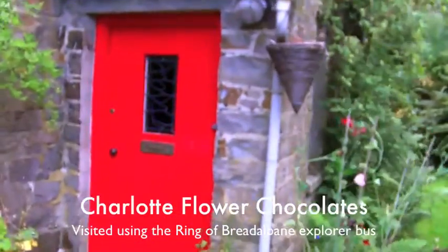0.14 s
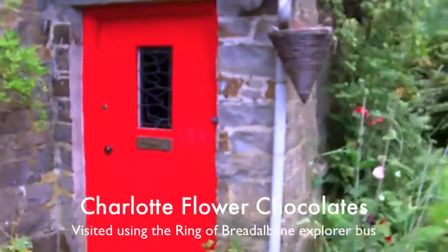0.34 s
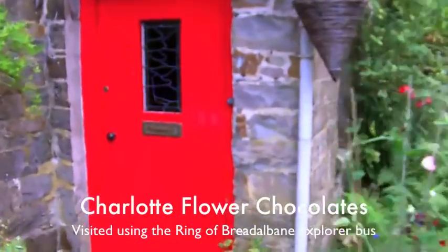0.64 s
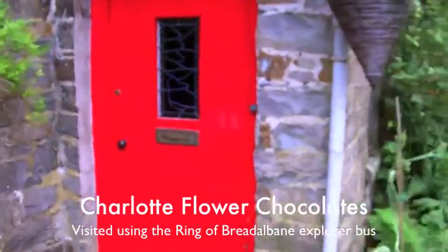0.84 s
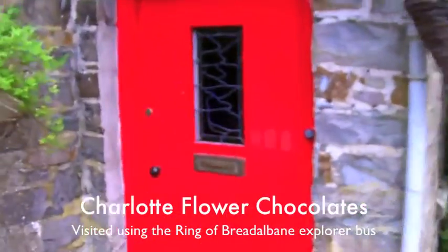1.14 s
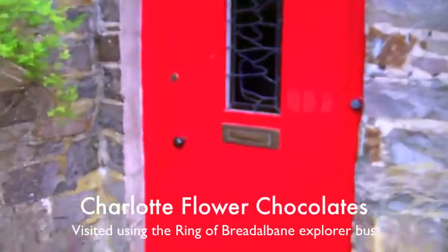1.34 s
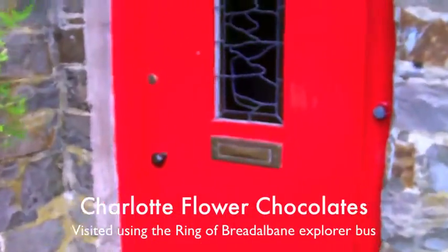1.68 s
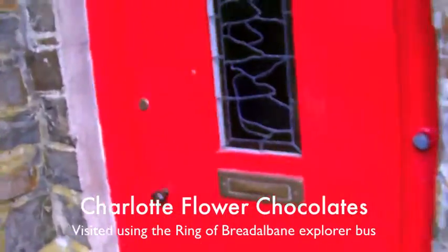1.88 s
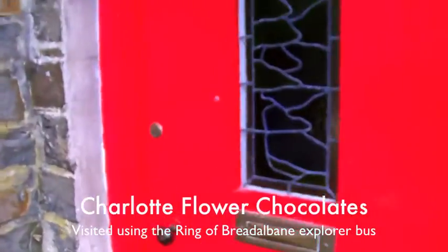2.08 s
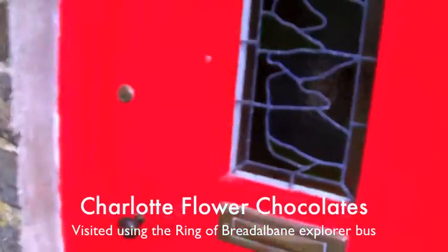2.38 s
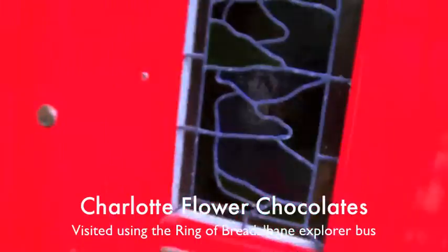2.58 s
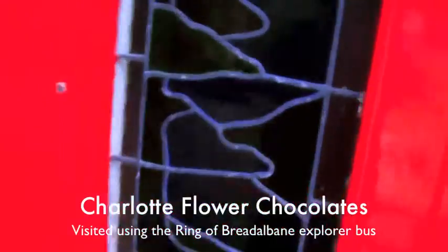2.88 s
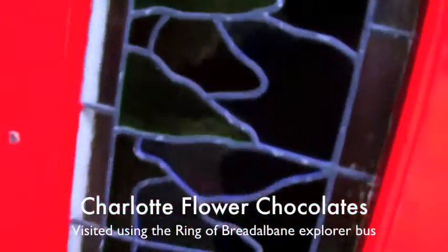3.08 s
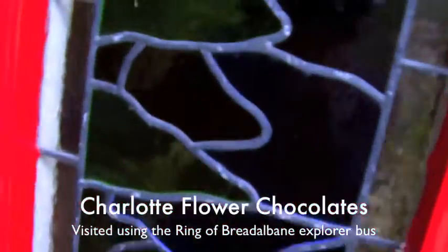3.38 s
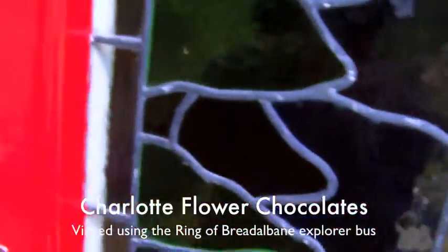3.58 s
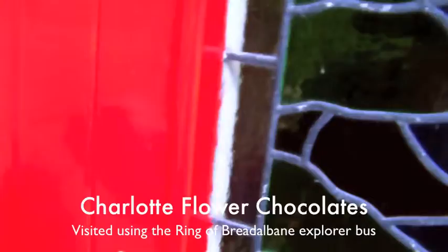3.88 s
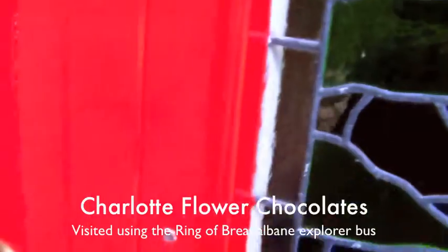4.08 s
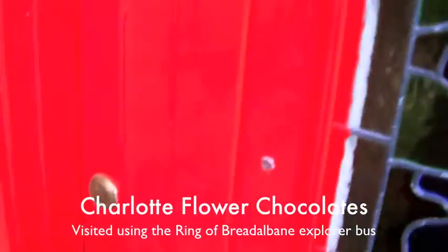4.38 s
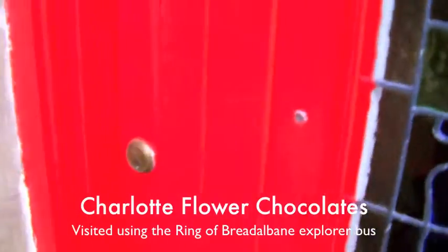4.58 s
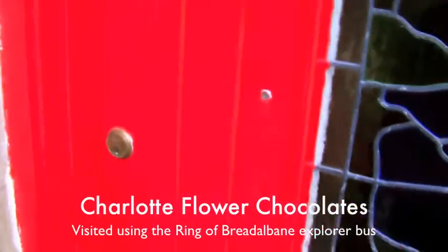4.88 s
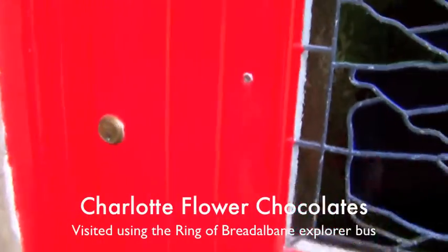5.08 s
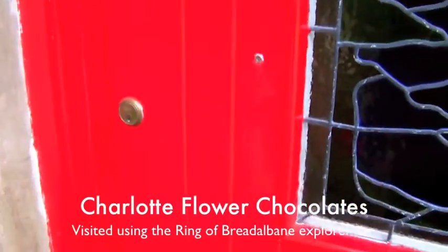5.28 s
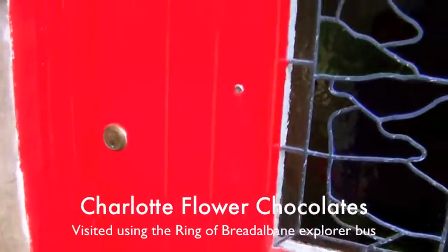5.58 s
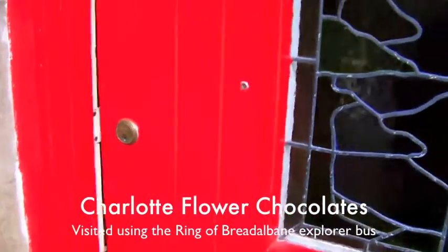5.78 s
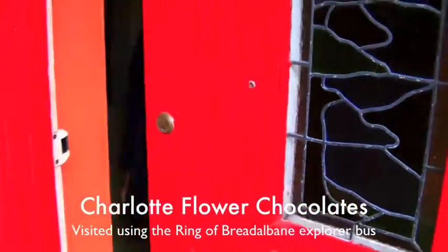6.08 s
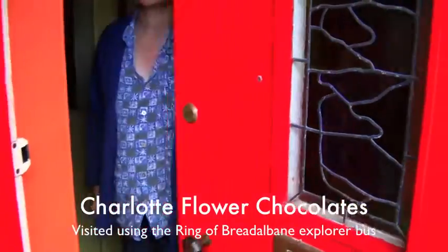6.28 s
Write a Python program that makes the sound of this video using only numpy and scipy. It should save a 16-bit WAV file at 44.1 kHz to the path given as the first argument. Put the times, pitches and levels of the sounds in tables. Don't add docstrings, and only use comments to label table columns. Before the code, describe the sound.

Gritty footsteps approach, three sharp raps rattle a wooden door, and following a quiet wait it unlatches, jerks free and clinks metallically.

```python
import sys
import numpy as np
from scipy import signal
from scipy.fft import rfft, irfft, next_fast_len
from scipy.io import wavfile
from scipy.ndimage import uniform_filter1d

SR = 44100
rng = np.random.default_rng(int(sys.argv[2]) if len(sys.argv) > 2 else 0)


def generate_wav(signal):
    frames = np.transpose(np.atleast_2d(signal))
    scaled = np.clip(frames, -1, 1) * 32767
    pcm = np.round(scaled).astype(np.int16)
    wavfile.write(sys.argv[1], SR, pcm)


def volts_from_db(level):
    exponent = np.asarray(level, float) / 20
    return 10 ** exponent


N = 284180
FFT = next_fast_len(N, real=True)


def evened(x):
    return x / np.sqrt(np.mean(x ** 2) + 1e-20)


def read(points, hz):
    f, value = np.transpose(points)
    return np.interp(np.log(hz + 1), np.log(f + 1), value)


def add(mix, s, sound):
    part = mix[round(s * SR):][:len(sound)]
    part += sound[:len(part)]


def smooth_noise(count, size):
    return uniform_filter1d(rng.standard_normal(count), size=size)


def coloured(points):
    gain = volts_from_db(read(points, np.fft.rfftfreq(FFT, 1 / SR)))
    return evened(irfft(rfft(rng.standard_normal(N), FFT) * gain, FFT)[:N])


def ring(modes, seconds):
    t = np.arange(round(seconds * SR)) / SR
    return sum(volts_from_db(db - 60 * t / t60) * np.sin(2 * np.pi * hz * t) for hz, db, t60 in modes)


def as_heard(x):
    size = next_fast_len(len(x), real=True)
    heard = rfft(x, size) * volts_from_db(read(PORT, np.fft.rfftfreq(size, 1 / SR)))
    return x * np.sqrt(size * len(x) / (2 * np.sum(abs(heard) ** 2)))


# start in seconds, level in dB, first click in dB, rattle in dB,
# delay of the rebound in seconds.
KNOCKS = [
    (3.3075, -19.5, -36, -34, .016),
    (3.5165, -20.5, -31, -31.5, .023),
    (3.6992, -22, -54.5, -30, .0058),
]
# contact in ms, rattle in dB, rattle t60 in seconds,
# rattle tilt in dB per octave.
TOUCH = (0.65, 0, 0.0237, 10)
STRIKE = (0.54, 0, .055, 0.87)
REBOUND = (.55, -29.5, 0.0168, 5)
# start in seconds, blow in dB,
# rattle in dB, rattle t60 in seconds, rattle tilt in dB per octave.
BOLT = [
    (5.6279, -41.5, -39.5, 0.14, -8),
    (5.640, -36.5, -37.5, .083, 1),
    (5.6489, -38, -23, 0.044, 3.5),
    (5.651, -58, -35, 0.17, -6),
    (5.6738, -36.5, -33, 0.054, -4.5),
    (5.690, -41, -51, .044, 7),
    (5.70, -43.5, -56, .17, -14.5),
    (5.715, -44, -43, 0.15, -12.5),
]
JERK = [
    (5.7291, -29, -22, 0.023, -5.5),
    (5.732, -33, -28.5, 0.052, -7),
    (5.737, -27, -35, 0.081, -7),
]
HINGE = [
    (6.2135, -67, -47, 0.12, 0.5),
    (6.228, -49, -50, 0.22, 4),
    (6.241, -44.5, -35, 0.25, 1),
    (6.258, -41.5, -42.5, 0.18, -10.5),
    (6.272, -37.5, -44, 0.24, -8.5),
    (6.30, -61, -60, .3, 7),
]


def blows():
    rows = []
    for spot, (s, db, click_db, rattle_db, after) in enumerate(KNOCKS):
        fall_db = -1050 * after
        contacts = [(-.0032, -11, click_db, TOUCH),
                    (0, 0, rattle_db, STRIKE),
                    (after, fall_db, fall_db, REBOUND)]
        for late, blow_db, loose_db, (contact_ms, own_db, t60, tilt) in contacts:
            rows.append((spot, s + late, db + blow_db, contact_ms, loose_db + own_db, t60, tilt))
    latch, hinge = -2, -1
    for spot, contact_ms, table in [(latch, 0.58, BOLT), (latch, 0.15, JERK), (hinge, 0.46, HINGE)]:
        rows += [(spot, s, db, contact_ms, *loose) for s, db, *loose in table]
    return rows


# frequency in Hz, level in dB.
RATTLE_TOP = [(7000, 2), (11000, -6.5), (16000, -6.5)]


def rattle(db, t60, tilt):
    t = np.arange(SR // 5) / SR
    hz = np.fft.rfftfreq(len(t), 1 / SR)
    bass_cut = hz ** 2 / (hz ** 2 + 300 ** 2)
    colour = volts_from_db(tilt * np.log2(np.maximum(hz, 280) / 3000) + read(RATTLE_TOP, hz)) * bass_cut
    uneven = volts_from_db(3.4 * evened(smooth_noise(len(t), 50)))
    envelope = volts_from_db(db - 60 * t / t60) * np.minimum(t / 0.0012, 1)
    noise = rng.standard_normal(len(t))
    return envelope * uneven * as_heard(irfft(rfft(noise) * colour, len(t)))


# frequency in Hz, t60 in seconds, level in dB when struck high, middle, low, at
DOOR_MODES = [(220.5, 0.054, -9, -9, -36, -15, -14), (357, .06, -9.5, -1.5, -20, -18, -14),
              (372, .3, -20.5, -25, -31, -30, -30), (385, 0.28, -23, -23, -28, -28, -28),
              (397.7, 0.081, -14.5, -3.5, -2.5, -7, -23), (426.5, 0.057, 0, -4.5, 4, -9.5, -29),
              (511, 0.019, 3, 3, -14, -29, -9), (579, 0.093, -13, -11.5, -8.5, -7, -5.5),
              (721, 0.043, -10, -12.5, -23, 3.5, -2), (810, 0.051, -5, -10, -13, -2, -2),
              (1079, 0.025, -5, -12, -14, 6, 3),
              (1245, 0.013, -3.5, -0.5, -21, 0.5, 7.5), (1492, 0.03, -12, -6, -34, 1, -20),
              (1643, 0.015, -11, -19, -30, 2.5, -8), (1848, 0.015, 0, -6, -31, -9, 3),
              (2070, 0.013, 4.5, 0.5, -29, -1, -16), (2290, 0.028, -7.5, -7, -23, -6.5, -18),
              (2640, .025, -16.5, -10.5, -29, -17, -10), (3300, 0.022, -4, -13.5, -23, -22, -10),
              (3870, 0.018, -4.5, -9.5, -13.5, -21, -10)]


def door():
    out = np.zeros(N)
    modes = DOOR_MODES
    panels = [ring([(hz, db[spot], t60) for hz, t60, *db in modes], .2) for spot in range(5)]
    for spot, s, blow_db, contact_ms, *loose in blows():
        push = np.sin(np.pi * np.arange(0, 1, 1000 / (SR * contact_ms)))
        add(out, s, volts_from_db(blow_db) * signal.fftconvolve(panels[spot], push / push.sum()))
        add(out, s, rattle(*loose))
    return out


# start in seconds, level in dB, free ringing in seconds before it touches again.
CLINKS = [
    (6.214, -59, 0.008),
    (6.237, -41, 0.0048),
    (6.2395, -28, 0.014),
    (6.262, -66, .01),
]
# frequency in Hz, level in dB, t60 in seconds.
METAL_MODES = [(2732, -2, 0.33), (4760, -12, 0.055), (5400, -14, 0.26), (5820, -24, .12),
               (7100, -12, 0.066), (8580, -3.5, .16)]


def fittings():
    out = np.zeros(N)
    t = np.arange(round(.3 * SR)) / SR
    for s, db, free in CLINKS:
        tip_db = 1.1 * rng.standard_normal(len(METAL_MODES))
        modes = [(hz, level + tip, t60) for (hz, level, t60), tip in zip(METAL_MODES, tip_db)]
        touch_db = -13 * np.clip((t - free) / 0.0023, 0, 1)
        add(out, s, volts_from_db(db + touch_db) * ring(modes, .3))
    return out


def doorway(x):
    t = np.arange(SR // 2) / SR
    taps = rng.choice([-1., 1.], len(t)) * (rng.random(len(t)) < .05) * (t > .004)
    low = signal.lfilter(*signal.butter(1, 900, fs=SR), taps)
    tail = volts_from_db(-60 * t / 0.22) * low + volts_from_db(-2 - 60 * t / 0.13) * (taps - low)
    return signal.oaconvolve(x, tail / np.linalg.norm(tail))[:N]


# start in seconds, level in dB, rise in ms, frequency in Hz, overtone in dB.
TICKS = [
    (2.3675, -42, 0.92, 2800, 0),
    (2.4374, -35.5, 0.79, 2840, 4),
    (3.3825, -30, 1.5, 3250, 5),
    (3.6642, -35.5, 2.96, 3300, 6),
    (3.682, -62.5, 1.1, 2900, -18),
    (5.648, -25.5, 1.5, 6000, 0),
    (5.7285, -30, .5, 5800, 0),
]


def ticks():
    out = np.zeros(N)
    for s, db, rise_ms, low_hz, high_db in TICKS:
        scrape = np.hanning(round(2 * rise_ms * SR / 1000))
        scrape = scrape * smooth_noise(400, 3)[:len(scrape)]
        scrape = np.diff(scrape, 2)
        modes = [(low_hz, 0, .008), (1.2 * low_hz, high_db - 26, .003)]
        sound = np.convolve(ring(modes, .04), scrape)
        add(out, s, volts_from_db(db) * sound / abs(sound).max())
    return out


# centre in seconds, length in seconds, level in dB,
# brightness in dB per octave.
STEPS = [(.696, 0.066, -55, -4), (.891, 0.024, -50.5, -1.5), (.983, 0.051, -48, -2),
         (1.19, 0.031, -49, -2.5), (1.497, 0.043, -52, -1.5), (1.683, .056, -44, -4), (1.791, .006, -49, 1),
         (1.988, 0.03, -45.5, -1), (2.193, 0.03, -46, -4), (2.237, 0.036, -45.5, 7.5),
         (2.303, 0.079, -49, 5), (2.366, .037, -41, 1.5), (2.391, 0.023, -37, 5), (2.407, 0.0099, -51, 6),
         (2.426, .03, -36, 4), (2.506, 0.017, -53, 5), (2.573, 0.05, -47, 3.5), (2.678, 0.043, -50, -1.5),
         (2.71, 0.027, -41.5, -1.5), (2.741, 0.021, -49, -4), (2.864, 0.041, -34, 2.5),
         (2.94, 0.05, -54, 0)]
SHUFFLES = [(3.618, .008, -56, 4), (4.787, .023, -50.5, -1.5), (4.812, 0.039, -46, 2),
            (4.865, 0.018, -52.5, -4), (5.043, .029, -51.5, 2), (5.079, 0.044, -49, -1),
            (5.123, 0.035, -45, -0.5), (5.615, .028, -51.5, 1), (5.892, .004, -57, -6),
            (6.411, 0.045, -60, 6)]
RUSTLES = [(.319, .004, -52, -5), (1.338, .0052, -52, 1), (1.43, 0.045, -54.5, 4.5),
           (1.601, .007, -53.5, 1), (2.17, 0.0041, -56, 0), (3.051, 0.029, -52.5, 0),
           (3.096, .049, -49.5, 3.5), (4.039, 0.0041, -51.5, 5), (4.239, .0033, -48.5, 5),
           (4.273, .0036, -54.5, 0), (4.376, 0.032, -56, -1), (4.542, 0.037, -57.5, 1),
           (5.524, .0049, -53, 0.5), (6.159, 0.0067, -56, -1)]
PATS = [(.214, 0.0039, -50.5, 0.5), (1.713, .0022, -39.5, 0), (3.215, 0.021, -62, 0),
        (4.423, 0.05, -65, 4.5), (5.431, .012, -56, 0), (5.488, 0.029, -56.5, -7), (5.56, .036, -55.5, -7)]
SCUFF_HZ = [800, 2500, 5700, 11000]
# pivot of its brightness in Hz, levels of the four bands in dB.
GRIT = (5100, [-15, -9.5, 0, -19.5])
CLOTH = (2400, [-19, 0, -5, -30])
PAT = (830, [-0.5, -1, -11, -30])


def scuffs():
    grit = rng.standard_normal(N) * volts_from_db(2.0 * evened(smooth_noise(N, 70)))
    power = np.zeros((len(SCUFF_HZ), N))
    for rows, (turn_hz, colour) in [(STEPS, GRIT), (SHUFFLES, GRIT), (RUSTLES, CLOTH), (PATS, PAT)]:
        octaves = np.log2(np.array(SCUFF_HZ) / turn_hz)
        for centre, length, level_db, bright in rows:
            levels = level_db + np.array(colour) + bright * octaves
            u = np.arange(-1, 2.5, 1 / (SR * length))
            stroke = np.where(u < 0, np.exp(-(u / .5) ** 2), 1 / (1 + (u / .5) ** 3))
            for band, db in zip(power, levels):
                add(band, centre - length, (volts_from_db(db - 6.5) * stroke) ** 2)
    hz = np.fft.rfftfreq(FFT, 1 / SR)
    bass_cut = hz ** 2 / (hz ** 2 + 450 ** 2)
    spectrum = rfft(grit, FFT)
    out = np.zeros(N)
    for row, band in zip(np.eye(len(SCUFF_HZ)), power):
        share = read(list(zip(SCUFF_HZ, row)), hz) * bass_cut
        out += as_heard(irfft(spectrum * share, FFT)[:N]) * np.sqrt(band)
    return out


# start in seconds, level in dB, t60 in seconds,
# tilt in dB per octave.
SNAPS = [(1.1764, -49, 0.086, 4.5), (1.6562, -42, 0.1, 0), (1.7089, -48, 0.085, -4), (2.357, -44, 0.1, 5),
         (2.366, -47, 0.026, -1), (2.4205, -56.5, 0.057, -4), (2.437, -53, 0.027, 4),
         (2.5021, -53, .04, 4.5), (2.7081, -45, 0.033, 2.5), (3.2047, -52, 0.13, -4),
         (4.0375, -58, 0.027, 0), (4.2375, -59, 0.028, 3), (4.8227, -48, 0.053, 2), (5.1195, -56, 0.069, 2)]
THUDS = [
    (4.771, -65.5, 0.32, -15),
    (5.4215, -60, 0.24, -11),
    (5.481, -62.5, 0.29, -8.5),
    (5.546, -62, 0.72, -14.5),
]
# start in seconds, length in seconds, level in dB, first and last frequency in Hz.
SQUEAKS = [
    (1.461, 0.03, -62.5, 1870, 1900),
    (1.499, 0.019, -58, 600, 596),
    (2.918, 0.031, -55.5, 1413, 1490),
    (2.939, 0.015, -55, 1570, 2620),
    (3.038, 0.03, -58, 2800, 2500),
    (3.06, .045, -59, 1600, 2300),
    (3.1, .022, -57, 3500, 3300),
    (2.695, .03, -58, 1800, 1750),
    (2.84, .03, -57, 1300, 1400),
    (4.524, 0.034, -65, 1520, 1510),
]


def soles():
    out = np.zeros(N)
    for s, *snap in [*SNAPS, *THUDS]:
        add(out, s, rattle(*snap))
    for s, length, db, from_hz, to_hz in SQUEAKS:
        hz = np.geomspace(from_hz, to_hz, round(length * SR))
        fuzz = evened(smooth_noise(4000, 90))[:len(hz)]
        tone = np.sin(2 * np.pi * np.cumsum(hz) / SR)
        add(out, s, volts_from_db(db) * (1 + .8 * fuzz) * np.hanning(len(hz)) * tone)
    return out


# frequency in Hz, density in dB per Hz.
AIR = [(60, 6), (400, -3), (1500, -5), (4000, -7), (7000, -7), (16000, -11)]
# time in seconds, level in dB.
AIR_DB = [(0, -61.5), (1.5, -61), (2.2, -62), (2.6, -60), (3.15, -62.5), (3.35, -63.5), (4.7, -64),
          (4.95, -60.5), (5.2, -63), (5.55, -64.5), (5.8, -60.5), (6.2, -59), (6.44, -56)]


def air():
    s, db = np.transpose(AIR_DB)
    flicker_db = 0.79 * evened(smooth_noise(N, 900))
    return as_heard(coloured(AIR)) * volts_from_db(np.interp(np.arange(N) / SR, s, db) + flicker_db)


def scene():
    hits = signal.lfilter(*signal.butter(4, 150, "highpass", fs=SR), door())
    hits = hits + fittings()
    return (hits + volts_from_db(-18.0) * doorway(hits) + ticks() + scuffs() + soles() + air())[None]


# frequency in Hz, gain in dB.
PORT = [(30, -60.5), (100, -41), (220, -12.5), (400, -3), (1000, 0.5), (4300, 3), (5200, 6.5), (5850, 11.5),
        (6600, 1.5), (8500, -8), (15300, -22.5), (15600, -36)]
# frequency in Hz, width in Hz.
NOTCHES = [(300, 234), (905, 148)]


def microphone(x):
    log_gain = np.log(volts_from_db(read(PORT, abs(np.fft.fftfreq(8192, 1 / SR)))))
    taps = np.fft.ifft(np.exp(np.conj(signal.hilbert(log_gain)))).real[:4096]
    x = signal.oaconvolve(x, taps)[:len(x)]
    for hz, width in NOTCHES:
        x = signal.lfilter(*signal.iirnotch(hz, hz / width, SR), x)
    return x


# start in seconds, level in dB, frequency in Hz.
BUMPS = [
    (0.099, -89, 80.7),
    (2.119, -84, 118),
    (2.309, -84, 102),
    (2.929, -99, 53.8),
    (2.969, -93, 32.3),
    (3.019, -98, 96.9),
    (5.549, -100, 86),
    (6.399, -87, 32.3),
]


def bumps():
    out = np.zeros(N)
    for s, db, hz in BUMPS:
        u = np.arange(0, 1, hz / (2.5 * SR))
        add(out, s, volts_from_db(db) * np.sin(np.pi * u) ** 2 * np.sin(2 * np.pi * 2.8 * u))
    return out


# frequency in Hz, density in dB per Hz.
HISS = [(100, -23), (5000, -7), (10000, -1.5), (14500, 2), (15300, 7), (15500, -24), (22000, -47)]


def hiss():
    return volts_from_db(-72.5) * coloured(HISS)


def roll_off(x):
    return signal.sosfilt(signal.butter(12, 16460, fs=SR, output="sos"), x)


def record(dry):
    mix = microphone(dry[0]) + bumps() + hiss()
    return roll_off(mix[None])


dry = scene()
out = record(dry)
generate_wav(out)
```